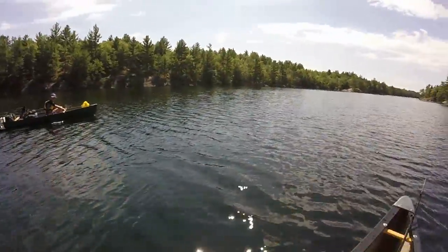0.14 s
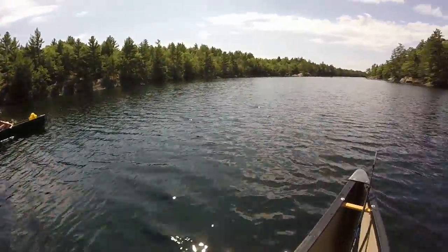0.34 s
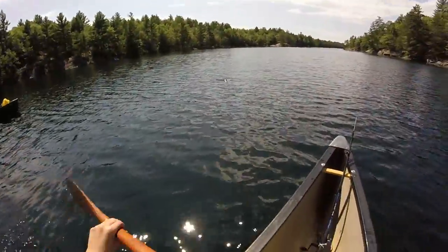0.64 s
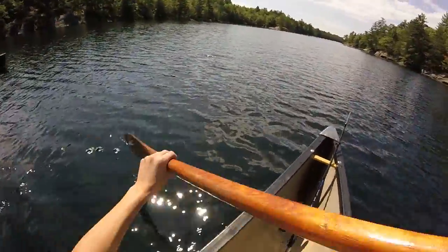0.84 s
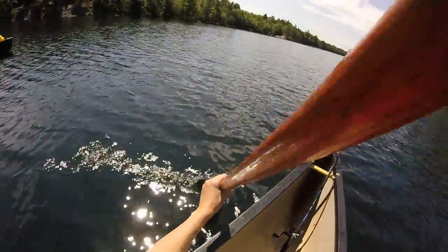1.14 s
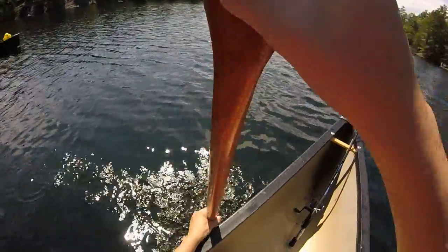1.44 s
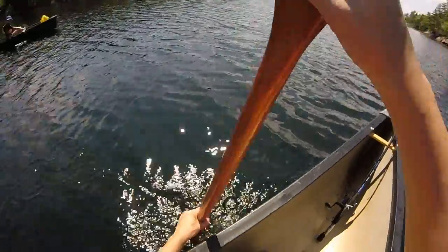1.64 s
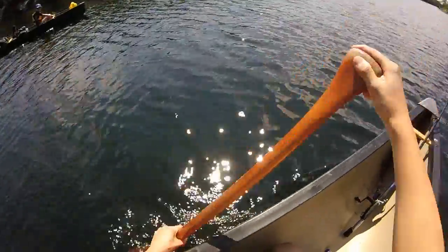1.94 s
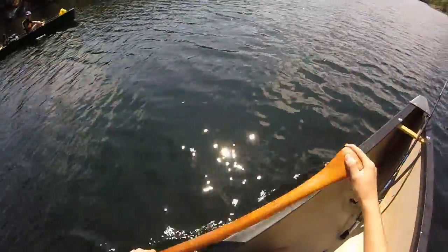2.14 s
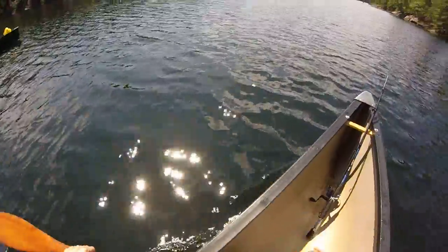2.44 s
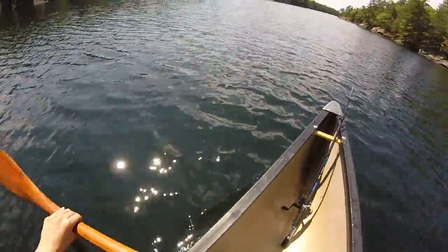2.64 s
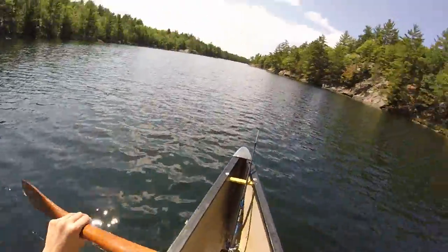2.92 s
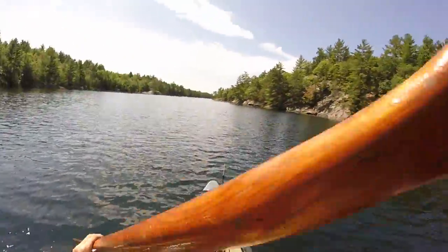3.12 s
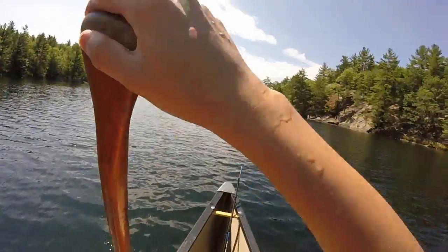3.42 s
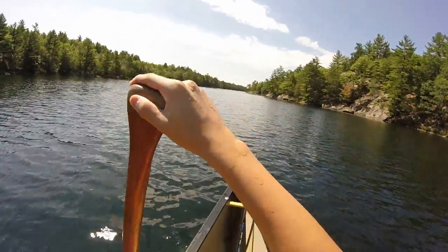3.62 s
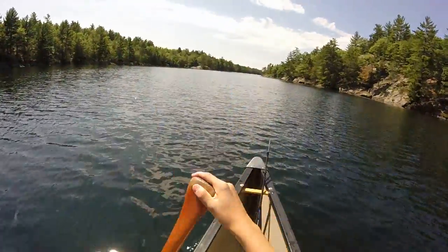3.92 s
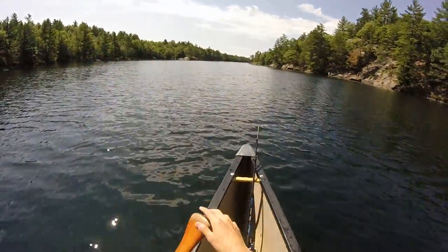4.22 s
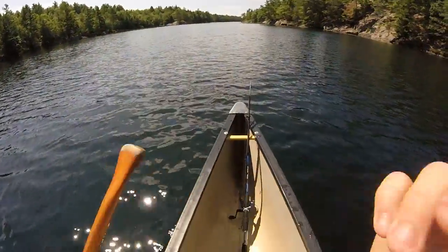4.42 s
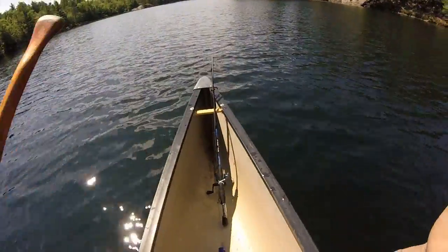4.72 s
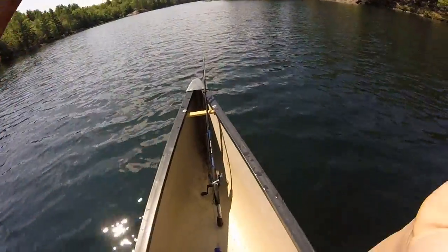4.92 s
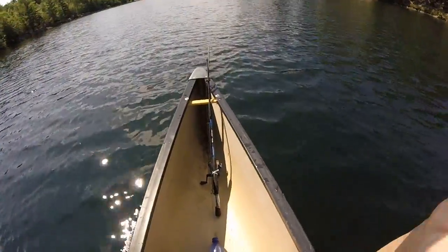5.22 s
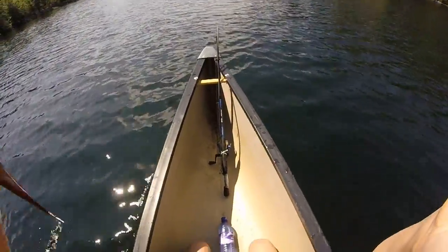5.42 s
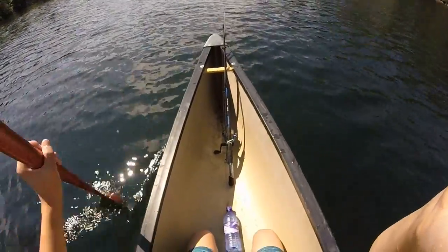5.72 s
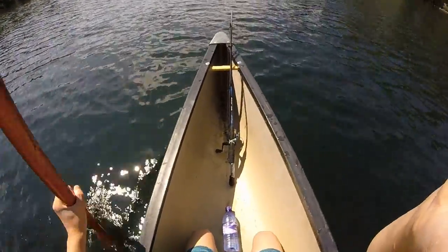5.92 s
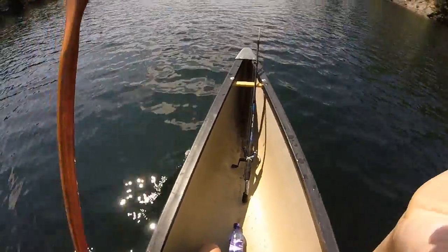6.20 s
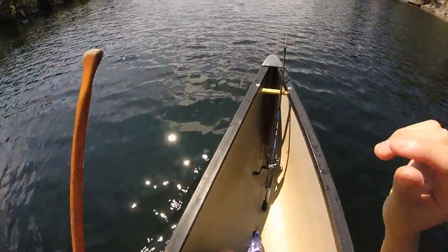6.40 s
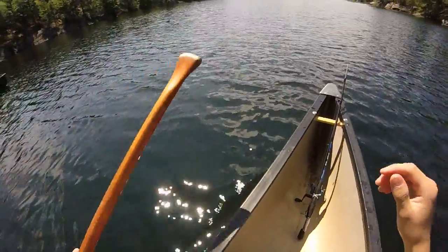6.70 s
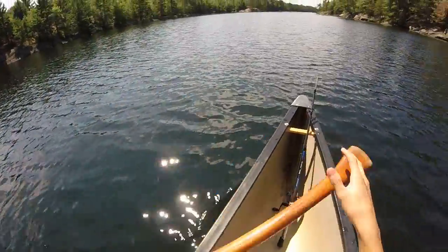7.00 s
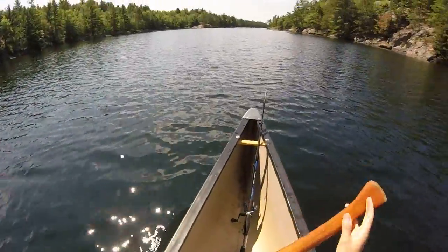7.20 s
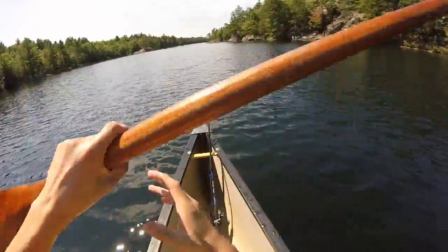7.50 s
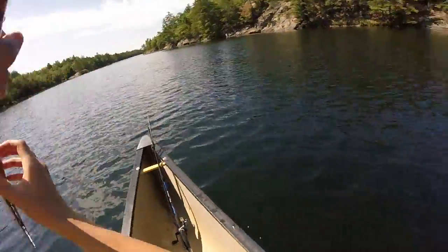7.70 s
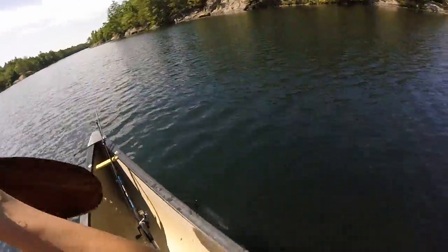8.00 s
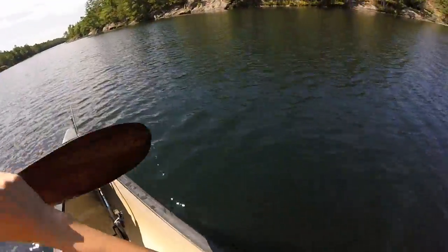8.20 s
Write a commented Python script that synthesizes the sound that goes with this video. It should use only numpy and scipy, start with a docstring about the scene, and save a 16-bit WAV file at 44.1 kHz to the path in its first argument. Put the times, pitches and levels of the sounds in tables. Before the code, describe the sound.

A muffled, very close microphone picks up low wind rumble, light hiss and small drips off a paddle. Around three seconds a hard strike bangs the plastic housing, with low air thumps and rattling bounces. After a lull come light taps, then gritty hand strokes and a busy run of dry clicks, a last strong knock, and low rumble with barely audible ticks.

```python
"""Deep wind and body rumble under microphone hiss, with faint taps and a few drops off a paddle's blade.
A camera in a sealed plastic case rides on a paddler's head on a quiet lake. The paddle strikes the case
and bounces, then a hand rubs, taps and squeezes it. Rumble and hiss are shaped noise; blows and tiny
slips drive the damped modes of the case; drops, low notes and the squeezed air are dying sines."""
import sys
import numpy as np
from scipy import signal
from scipy.fft import rfft, irfft, next_fast_len
from scipy.io import wavfile
from scipy.ndimage import uniform_filter1d

SR = 44100
rng = np.random.default_rng(int(sys.argv[2]) if len(sys.argv) > 2 else 0)


def transcribe(u):
    """Save the signal u as a 16-bit wav file named by the first command-line argument.

    u: samples, shape (n,) or (channels, n), limited to [-1, 1]; the rate is SR.
    q: integer samples, one column per channel.
    """
    v = np.clip(np.atleast_2d(u).T, -1, 1)
    q = np.round(v * 32767).astype(np.int16)
    wavfile.write(sys.argv[1], SR, q)


N = 368235


def gain_of(db):
    """Decibels to amplitude gain."""
    return 10 ** (np.asarray(db) / 20)


def evened(x):
    """Scales to rms 1."""
    return x / np.sqrt(np.mean(x ** 2) + 1e-20)


def add(mix, start_s, sound):
    """Adds a sound to the mix from start_s, cut at the end of the mix."""
    part = mix[round(start_s * SR):][:len(sound)]
    part += sound[:len(part)]


def coloured(points):
    """Steady noise of rms 1 with the given spectrum, interpolated over log frequency."""
    point_hz, point_db = np.transpose(points)
    size = next_fast_len(N)
    hz = np.fft.rfftfreq(size, 1 / SR)
    shape = gain_of(np.interp(np.log(hz + 1), np.log(point_hz + 1), point_db))
    return evened(irfft(rfft(rng.standard_normal(size)) * shape, size)[:N])


def bandpassed(x, order, band_hz):
    """Butterworth bandpass along the last axis."""
    return signal.sosfilt(signal.butter(order, band_hz, "bandpass", fs=SR, output="sos"), x)


# Noise spectrum of the hiss. Each row: frequency in Hz, relative density in dB per Hz.
HISS_SPECTRUM = [(59, -17), (100, -16), (209, -6), (275, -4), (354, -4.5), (446, -5.5), (506, -5.5),
                 (679, -7), (3220, -17), (13800, -37), (15300, -49)]
HISS_RMS_DB = -57


def hiss():
    """Microphone self-noise: steady shaped noise."""
    return gain_of(HISS_RMS_DB) * coloured(HISS_SPECTRUM)


# Rumble levels before the lumps. Each row: time in seconds, deep part in dB, upper part in dB.
RUMBLE_LEVELS = [(0.0, -44, -52), (0.3, -50.5, -53), (0.7, -52.5, -55), (1.05, -53.5, -59.5),
                 (2.72, -54.5, -58), (3.19, -46.5, -55.5), (3.739, -51.5, -60.5), (4.14, -49.5, -49.5),
                 (4.4, -56, -58.5), (6.26, -54.5, -57.5), (6.93, -61.5, -59.5), (8.35, -49, -57)]
# Spectrum of the deep part. Each row: frequency in Hz, relative density in dB per Hz.
RUMBLE_DEEP_SPECTRUM = [(10, 1.5), (25, 3.5), (60, -3.5), (100, -19.5), (200, -26.5), (400, -68)]
# Spectrum of the upper part. Each row: frequency in Hz, relative density in dB per Hz.
RUMBLE_UPPER_SPECTRUM = [(40, -16), (80, 5.5), (130, 0), (250, -5.5), (500, -18), (1000, -73.5)]
GRIP_START_S, GRIP_END_S, GRIP_EDGE_S = 4.68, 6.12, 0.049
GRIP_DEEP_DB, GRIP_UPPER_DB = -39.5, -53
SHUDDER_DB, SHUDDER_LAW, SHUDDER_T60_S = -22.5, 0.73, 0.11  # level goes with swing ** law


def rumble(lumpy_db=3.0):
    """Wind and the wearer's movements: lumpy noise, raised by the grip and shaken by each squeeze."""
    time_s, deep_db, upper_db = np.transpose(RUMBLE_LEVELS)
    t = np.arange(N) / SR
    to_edge_s = np.minimum(t - GRIP_START_S, GRIP_END_S - t)
    grip = np.clip(to_edge_s / GRIP_EDGE_S + .5, 0, 1)
    deep = gain_of(np.interp(t, time_s, deep_db)) + gain_of(GRIP_DEEP_DB) * grip
    upper = gain_of(np.interp(t, time_s, upper_db)) + gain_of(GRIP_UPPER_DB) * grip
    shudder = gain_of(SHUDDER_DB - 60 * t[:SR] / SHUDDER_T60_S)
    for start_s, swing, _ in SQUEEZES:
        add(upper, start_s, abs(swing) ** SHUDDER_LAW * shudder)
    lumps = gain_of(lumpy_db * coloured([(2, -20), (5, -4), (25, 14.5), (60, -67.5)]))
    return (deep * coloured(RUMBLE_DEEP_SPECTRUM) + upper * coloured(RUMBLE_UPPER_SPECTRUM)) * lumps


def dying_sine(swing, hz, t60_s):
    """Damped oscillation with a 2 ms onset; swing is the amplitude before decay."""
    t = np.arange(SR) / SR
    return swing * np.sin(2 * np.pi * hz * t) * gain_of(-60 * t / t60_s) * np.minimum(t / 0.002, 1)


# Drops off the paddle. Each row: start in seconds, amplitude before decay in dB, frequency in Hz.
DRIPS = [(0.708, -48.5, 2600), (0.775, -45, 3020), (1.228, -48, 3150), (1.249, -44, 3250),
         (1.275, -37.5, 3020), (1.319, -45, 2600), (1.392, -50, 3000)]
DRIP_T60_S = .019


def drips(mix):
    """Each drop is one short dying sine."""
    for start_s, db, hz in DRIPS:
        add(mix, start_s, dying_sine(gain_of(db), hz, DRIP_T60_S))


# Short low notes. Each row: start in seconds, amplitude before decay in dB.
HUMS = [(2.285, -39.5), (4.178, -40.5)]
HUM_HZ, HUM_T60_S = 308.6, 0.094


def hums(mix):
    """Each note is a dying sine at one fixed pitch."""
    for start_s, db in HUMS:
        add(mix, start_s, dying_sine(gain_of(db), HUM_HZ, HUM_T60_S))


# Swings of the air in the case. Each row: start in seconds, signed amplitude before decay, swing in Hz.
SQUEEZES = [(2.295, .025, 67), (2.333, .03, 54.7), (3.248, 0.83, 47.7), (3.272, -0.75, 95),
            (3.29, 0.35, 20.6), (3.314, 0.77, 55), (3.334, -0.51, 29), (3.379, -0.29, 134),
            (4.139, -.02, 63.7), (4.206, -.02, 51), (4.646, -0.34, 59.6), (4.655, 0.13, 50),
            (4.891, 0.12, 98), (4.924, 0.098, 25.7), (5.061, 0.31, 174), (5.194, -0.1, 80),
            (5.296, -0.086, 127), (5.306, 0.27, 78), (5.318, -0.088, 35.5), (5.559, -0.083, 23),
            (5.591, -0.12, 36.3), (5.891, 0.075, 87.5), (5.946, 0.052, 38), (6.143, -0.13, 48.46),
            (6.609, -.035, 45.7)]
SETTLE_SWINGS = 4.53  # cycles to lose 60 dB


def squeezes(mix):
    """The air pumped in the sealed case swings a few times and settles."""
    for start_s, swing, hz in SQUEEZES:
        add(mix, start_s, dying_sine(swing, hz, SETTLE_SWINGS / hz))


WALL_HZ, WALL_TOP_HZ = (586, 2870), (3520, 12600)  # bands the wall passes: main modes, upper modes


def rings(modes, wall_hz, ring, size=3000):
    """One dying sine per mode, as rows, heard through the wall; ring scales the free decay time."""
    hz, db, t60_s = np.transpose(modes)[:, :, None]
    t = np.arange(size) / SR
    sines = gain_of(db - 60 * t / (t60_s * ring)) * np.sin(2 * np.pi * hz * t)
    return bandpassed(sines, 3, wall_hz)


def favour(modes, hz, slope_db):
    """The place of contact drives the modes near hz most; slope in dB per octave."""
    octaves = abs(np.log2(np.transpose(modes)[0][:, None] / hz))
    return gain_of(-slope_db * octaves)


def shoved(force):
    """The whole case moves under a force, without ringing."""
    return bandpassed(force, 2, (202.56, 960))


def driven(modes, wall_hz, slips, hz, slope_db, wander_db):
    """Slips ring every mode, each swelling and fading by itself as the contact creeps; about rms 1."""
    noise = rng.standard_normal((SR // 4, len(modes)))
    wander = evened(uniform_filter1d(noise, size=900, axis=0))[:len(slips)].T
    share = favour(modes, hz, slope_db) * gain_of(wander_db * wander)
    ringing = signal.oaconvolve(slips[None], rings(modes, wall_hz, ring=0.52), axes=1)[:, :len(slips)]
    power = (share ** 2 * ringing.var(1)[:, None]).sum(0)
    return (share * ringing).sum(0) / np.sqrt(power)


# Main modes of the case. Each row: frequency in Hz, level before the wall in dB, undamped t60 in seconds.
CASE = [(760, -5, .015), (1320, -3, .03), (2010, -1, .013), (2405, 0, .04), (2760, -2, .022),
        (3120, -9, .02), (1672, -4, .065), (1935, -34, 1.5)]
HELD = CASE[:-1]  # a hand on the case stills the long thin ring of the last mode
# Thin upper modes. Each row: frequency in Hz, level before the wall in dB, undamped t60 in seconds.
CASE_TOP = [(4135, -2, 0.0148), (4926, -2.5, 0.009), (5710, -4, 0.012), (6700, -1.5, 0.0039),
            (8170, -6.5, 0.014), (9460, -26.5, 0.0021), (11550, -16.5, 0.0082), (14280, -11, .006)]
RUB_WALL_HZ, RUB_THUD_DB = (1150, 3050), -22
RUB_ATTACK_S, RUB_RELEASE_S = 0.0027, 0.0026


def rub(length_s, start_db, end_db, top_db, hz, top_hz, grit_db=2.6, slips_per_s=4400.0):
    """Many tiny slips of uneven size, in clumps, drive the modes of the case."""
    t = np.arange(0, length_s, 1 / SR)
    clump_draw, sign_draw, slip_draw = rng.random((3, len(t)))
    clumps = evened(uniform_filter1d(clump_draw - .5, size=200))
    sizes = 0.41 + (slip_draw < slips_per_s / SR)
    slips = np.sign(sign_draw - .5) * sizes * gain_of(grit_db * clumps)
    body = driven(HELD, RUB_WALL_HZ, slips, hz, slope_db=30.5, wander_db=3.5)
    top = driven(CASE_TOP, WALL_TOP_HZ, slips, top_hz, slope_db=16.0, wander_db=1.0)
    thud = evened(shoved(slips))
    fade = np.minimum(np.minimum(t / RUB_ATTACK_S, (length_s - t) / RUB_RELEASE_S), 1)
    level = gain_of(start_db + (end_db - start_db) * t / length_s)
    return level * fade * (body + gain_of(top_db) * top + gain_of(RUB_THUD_DB) * thud)


# Scrapes during the paddle's strike and bounces. Each row: start in seconds, length in seconds,
# body level at start in dB, at end in dB, upper modes relative to body in dB, favoured Hz, favoured upper Hz.
SCRAPES = [(3.254, .05, -30, -39, -10, 2400, 4200), (3.305, .025, -37, -35, -9, 2800, 4500),
           (3.33, .08, -41, -57, -18, 1900, 4700)]


def paddle_scrapes(mix):
    """Tiny slips scrape the case during the paddle's strike and bounces."""
    for start_s, *stroke in SCRAPES:
        add(mix, start_s, rub(*stroke))


# Strokes of the hand. Each row: start in seconds, length in seconds, body level at start in dB,
# at end in dB, upper modes relative to body in dB, favoured Hz, favoured upper Hz.
RUBS = [(3.875, 0.063, -49, -59, -22, 1350, 4700), (3.876, 0.12, -53, -65, -28, 2700, 4700),
        (4.023, 0.097, -52, -55, -21, 2760, 4700), (4.269, 0.16, -62, -65, -21, 2680, 4900),
        (4.62, 0.049, -28, -34, -20.5, 2400, 8250), (4.67, 0.065, -43, -36.5, -7.5, 2400, 4100),
        (4.734, 0.076, -40, -40, -11.5, 2220, 4340), (4.811, 0.056, -36.5, -33, -19, 2430, 7560),
        (4.861, 0.038, -33.5, -33, -16.5, 2420, 4730), (4.893, .045, -26, -27.5, -21, 2360, 8300),
        (4.938, 0.15, -38.5, -36.5, -12, 2080, 4400), (5.08, .1, -42, -49.5, -18.5, 2040, 5200),
        (5.186, 0.031, -29.5, -36.5, -19.5, 2140, 4500), (5.211, 0.054, -30, -25.5, -19.5, 2400, 7130),
        (5.257, 0.06, -30.5, -27.5, -19, 2330, 5400), (5.31, 0.04, -41, -53, -31, 2310, 4600),
        (5.347, 0.088, -45.5, -37, -13, 2150, 4400), (5.436, 0.13, -42.5, -60, -14.5, 1950, 4300),
        (5.523, 0.053, -40, -36.5, -20, 1848, 4230), (5.576, 0.0974, -43.5, -44, -22, 1770, 4500),
        (6.045, 0.13, -44, -54, -25.5, 1800, 4700), (6.133, 0.056, -31, -44, -25, 2380, 6000),
        (6.183, 0.039, -29, -39.5, -26, 2600, 8300), (6.208, 0.057, -35.5, -49.5, -22, 2410, 6200)]


def hand_rubs(mix):
    """The hand slides over the case in short strokes."""
    for start_s, *stroke in RUBS:
        add(mix, start_s, rub(*stroke))


def blow(peak_db, hz, top_db, ring, contact_ms, modes, wall_hz, slope_db, thud_db, size):
    """One clean blow inside a short rough contact that swells and fades; the case rings on."""
    chatter = rng.standard_normal(800)
    u = np.arange(len(chatter)) / SR * 1000 / contact_ms
    swell = u ** 0.818 * np.exp(-u)
    rough = chatter * swell / np.linalg.norm(swell)
    force = rough + 0.76 * (swell == swell.max())
    body_ring = (favour(modes, hz, slope_db) * rings(modes, wall_hz, ring, size)).sum(0)
    body = signal.oaconvolve(force, body_ring)
    top = signal.oaconvolve(rough, rings(CASE_TOP, WALL_TOP_HZ, ring, size).sum(0))
    thud = shoved(np.pad(force, (0, size - 1)))
    thud_gain = gain_of(thud_db) * (1 - ring)  # the more damped the blow, the more it thuds
    sound = body / abs(body).max()
    sound += thud_gain * thud / abs(thud).max()
    sound += gain_of(top_db) * top / abs(top).max()
    return gain_of(peak_db) * sound


# Taps and creaks. Each row: start in seconds, body peak in dB, favoured Hz,
# upper modes relative to body in dB, share of the free ring 0-1.
TAPS = [(0.109, -33, 2130, -21, 0.1), (0.777, -43.5, 1310, -10, 0.6), (0.858, -47, 1320, -18, 0.92),
        (1.275, -37.5, 1460, 3.5, 0.66), (1.321, -44.5, 1400, -9.5, 0.4), (2.283, -36.5, 1310, -20, 0.99),
        (2.331, -39, 1360, -25, 0.07), (3.881, -29, 2660, -35, 0.04), (3.993, -35, 2700, -27, 0.05),
        (4.013, -34, 2490, -29.5, 0.01), (4.032, -30.5, 2720, -30, 0.4), (4.04, -29, 1930, -27, 0.14),
        (4.056, -32, 2760, -30, 0.18), (4.065, -23, 1200, -28, 0.09), (4.067, -33, 2760, -30, 0.4),
        (4.08, -24, 2490, -27, 0.04), (4.101, -23.5, 2650, -33, 0.37), (4.167, -39.5, 1220, -24, 0.03),
        (4.572, -46, 1170, -10, 0.1), (4.649, -10.5, 2130, -19.5, 0.3), (5.061, -13, 1760, -45, 0.03),
        (5.194, -14, 2360, -33, 0.3), (5.223, -12, 2430, -15.5, 0.08), (5.465, -20.5, 2217, -31, 0.1),
        (5.478, -26, 1635, -19, 0.06), (5.51, -32, 1560, -20, 0.06), (5.524, -25, 1870, -20, 0.3),
        (5.545, -21, 2820, -33, 0.3), (5.562, -27, 1750, -25, 0.5), (5.571, -21, 2600, -20, 0.25),
        (5.594, -16.5, 2060, -18, 0.5), (5.619, -30, 1840, -32, 0.4), (5.642, -18, 1730, -24, 0.3),
        (5.708, -14, 2190, -22.5, 0.24), (5.8, -42, 2420, -15, 0.38), (5.835, -14, 2180, -24, 0.38),
        (5.853, -31, 2000, -27, 0.15), (5.871, -13.5, 2680, -23, 0.37), (5.891, -21, 1990, -17.5, 0.63),
        (5.946, -22, 2260, -31, 0.38), (5.993, -28.5, 1980, -26, 1), (6.053, -17.5, 2150, -22.5, 0.2),
        (6.1444, -5, 2360, -22, 0.42), (6.146, -11.5, 1694, -30, 0.6), (6.182, -12, 2480, -12.5, 0.4),
        (6.1835, -9.5, 1680, -32, 0.98), (6.718, -44, 1967, -21, 0.42), (7.11, -47, 2000, -15, 0.2),
        (8.041, -46, 1300, -17, 0.3), (8.123, -35.5, 2555, -33, 0.07)]
TAP_MS, TAP_THUD_DB = 1.08, -12  # time scale of the contact; thud before damping share
FINGER_LOW = 0.36  # low band edge as a share of the favoured Hz


def taps(mix):
    """A fingertip drives a few modes near its favoured frequency."""
    for start_s, peak_db, hz, top_db, ring in TAPS:
        wall_hz = (FINGER_LOW * hz, WALL_HZ[1])
        add(mix, start_s, blow(peak_db, hz, top_db, ring, TAP_MS, HELD, wall_hz,
                               slope_db=64.0, thud_db=TAP_THUD_DB, size=3000))


# Paddle strike and bounces. Each row: start in seconds, body peak in dB, favoured Hz,
# upper modes relative to body in dB.
KNOCKS = [(3.2490, 1, 1400, -26), (3.2512, 5.5, 2400, -22), (3.263, -13, 1900, -20),
          (3.276, -13, 2800, -12), (3.290, -19, 1500, -25), (3.3222, -12, 1500, -22),
          (3.341, -18, 1500, -20), (3.370, -23, 1900, -18), (3.379, -6, 1600, -30), (3.392, -26, 1900, -15),
          (3.409, -31, 2200, -18)]
KNOCK_MS, KNOCK_THUD_DB = 1.8, -4.5  # time scale of the contact; thud before damping share
KNOCK_RING = .2  # share of the free ring


def paddle_knocks(mix):
    """The broad paddle drives all modes of the case."""
    for start_s, peak_db, hz, top_db in KNOCKS:
        add(mix, start_s, blow(peak_db, hz, top_db, KNOCK_RING, KNOCK_MS, CASE, WALL_HZ,
                               slope_db=1.0, thud_db=KNOCK_THUD_DB, size=13000))


def scene():
    """Noise floor, drops and notes, then all that touches the case."""
    mix = rumble() + hiss()
    drips(mix)
    hums(mix)
    squeezes(mix)
    paddle_scrapes(mix)
    hand_rubs(mix)
    taps(mix)
    paddle_knocks(mix)
    return mix[None]


RECOVERY_DB_PER_S, EDGE_HZ = 16, 15400


def record(dry):
    """A limiter ducks at once under the loudest blow and recovers slowly; then a lowpass."""
    peak_db = 20 * np.log10(abs(dry[0]) + 1e-9)
    fall_db = np.arange(N) * RECOVERY_DB_PER_S / SR
    held_db = np.maximum.accumulate(peak_db + fall_db) - fall_db
    over_db = np.maximum(held_db + .5, 0)  # ceiling at -0.5 dB
    ducked = dry / gain_of(over_db)
    lowpass = signal.firwin(511, EDGE_HZ, window=("kaiser", 9), fs=SR)
    return signal.oaconvolve(ducked, lowpass[None], "same")


dry = scene()
out = record(dry)
transcribe(out)
```